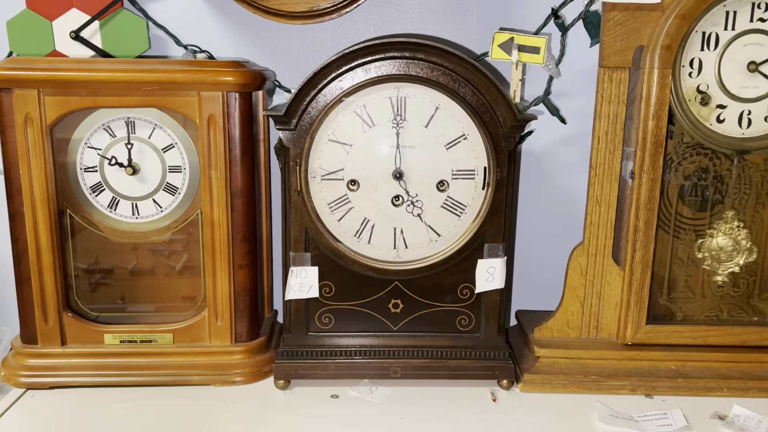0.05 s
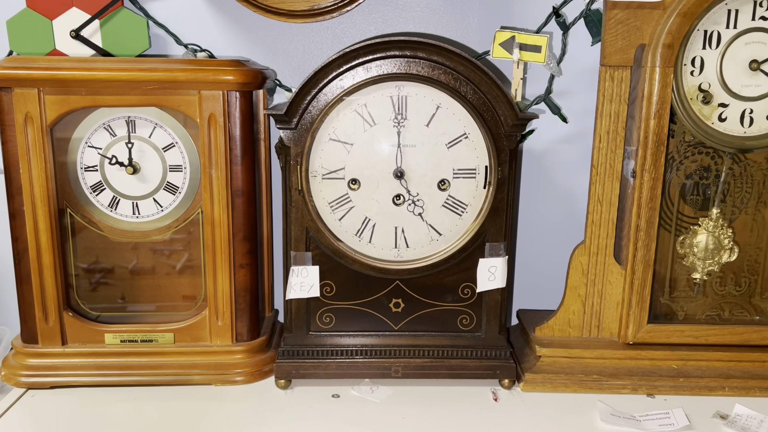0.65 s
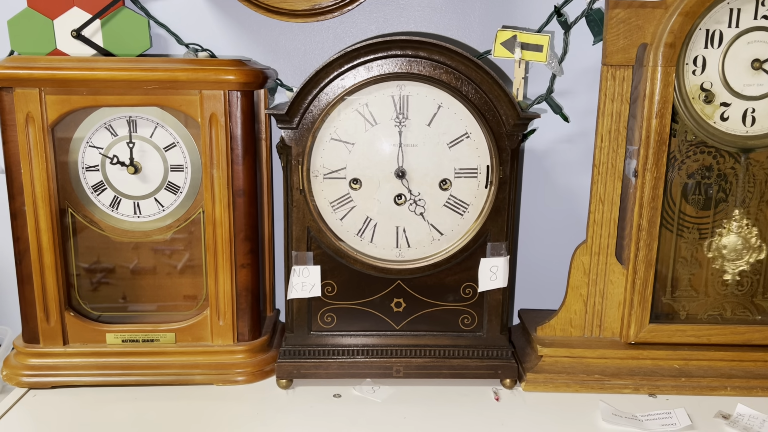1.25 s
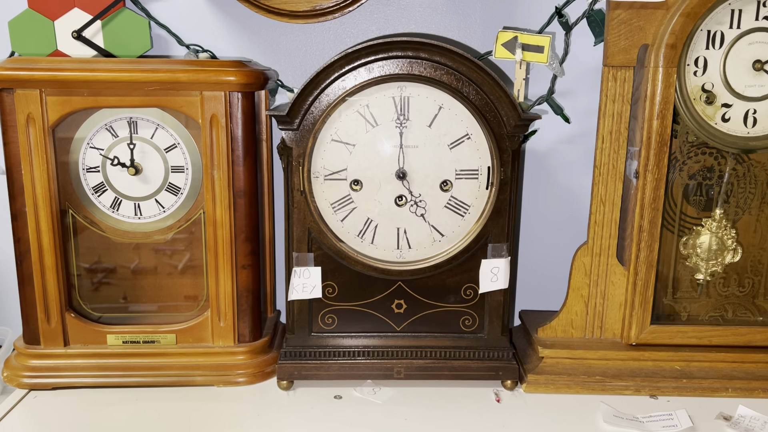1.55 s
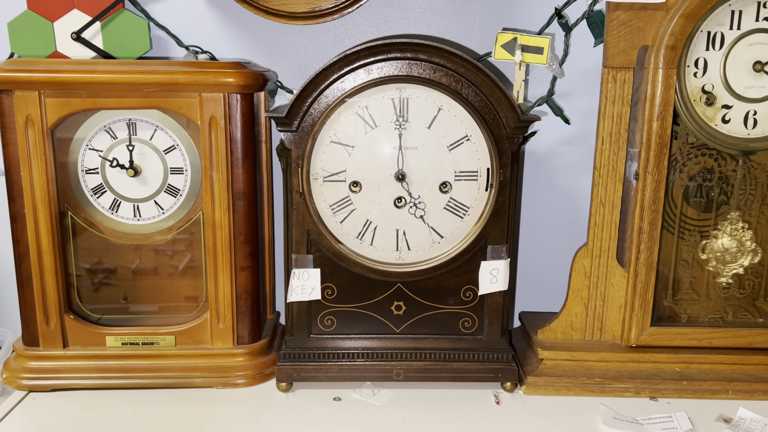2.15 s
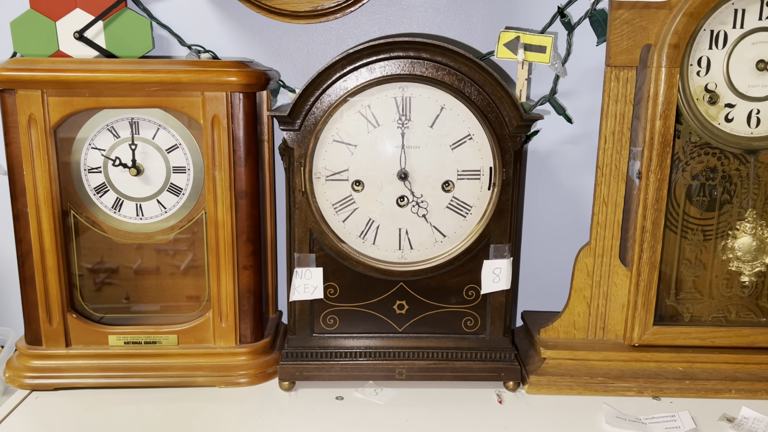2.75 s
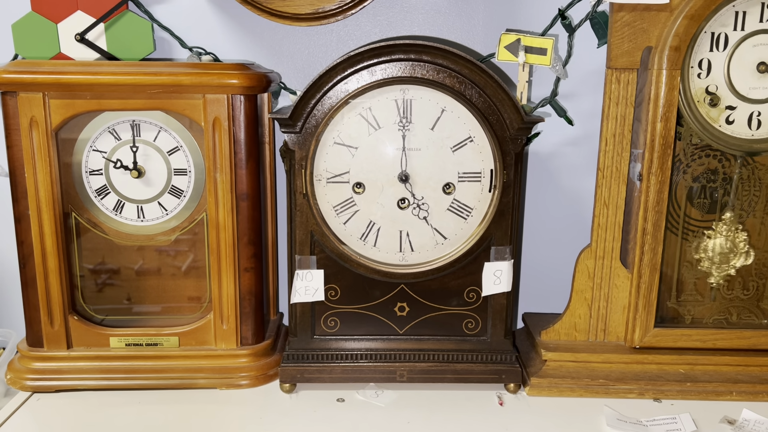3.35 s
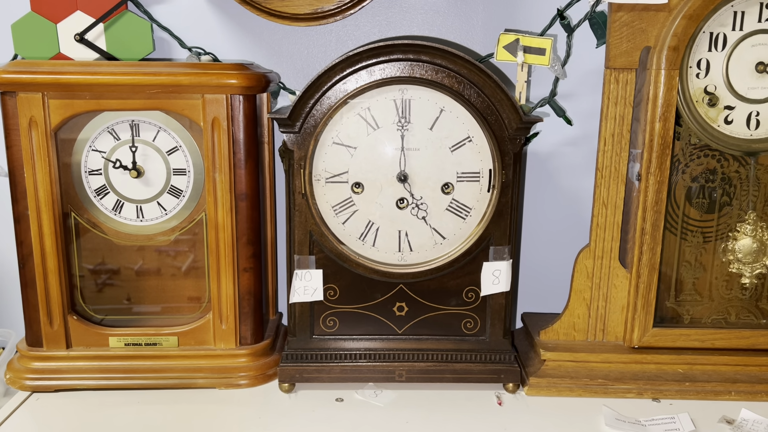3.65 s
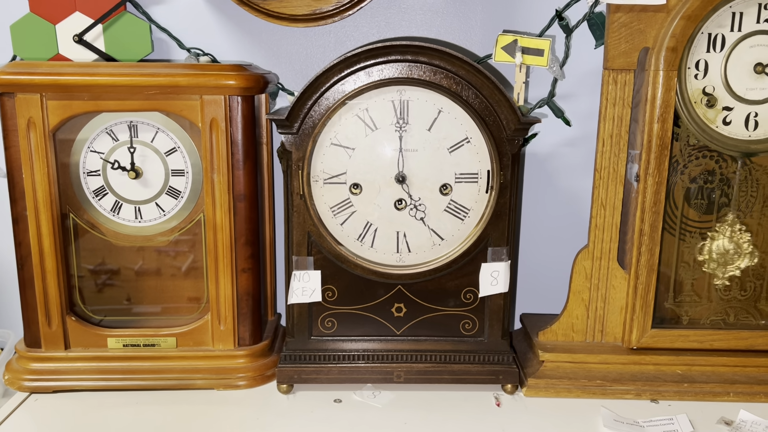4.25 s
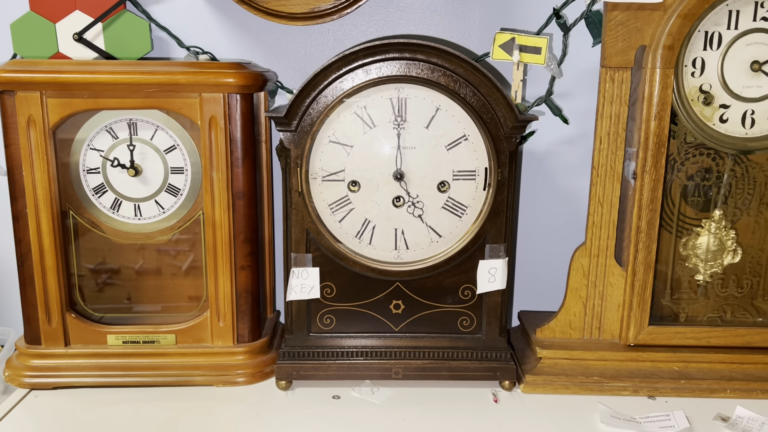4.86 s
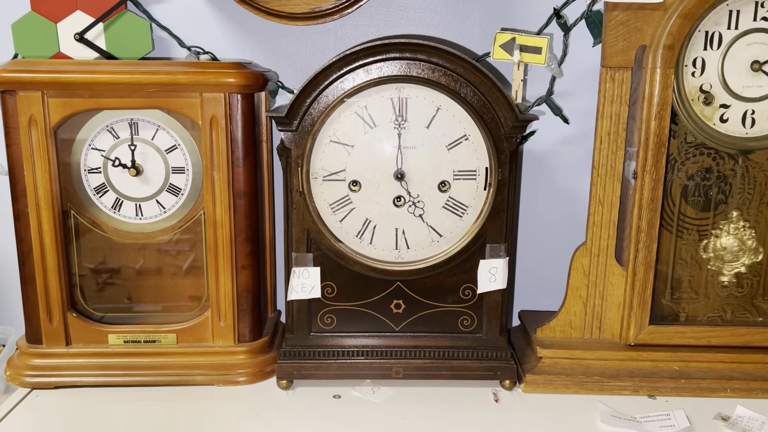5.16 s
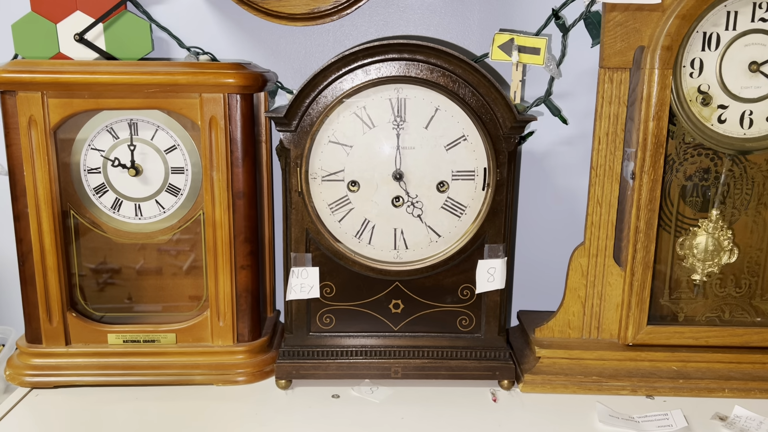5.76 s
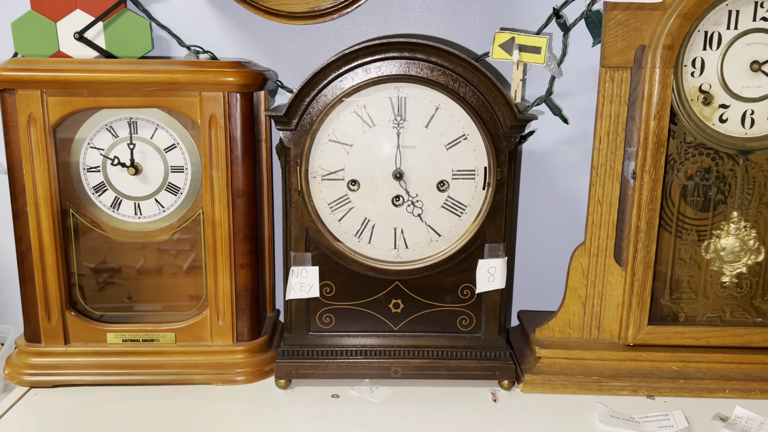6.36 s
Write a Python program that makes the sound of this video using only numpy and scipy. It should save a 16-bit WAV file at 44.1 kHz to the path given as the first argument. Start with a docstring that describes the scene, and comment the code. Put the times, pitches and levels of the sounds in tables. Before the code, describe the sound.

A shop full of clocks ticks steadily from start to finish. Close to the microphone, crisp brass ticks and wooden knocks overlap in an uneven, busy pattern, with one low clock thudding softly beneath them. Thin plastic clicks and fainter, more distant ticking fill the gaps. The room gives each beat a short echo, and a low hum and faint air noise lie underneath throughout.

```python
"""Pendulum clocks knock and ring in their wooden cases on a shop shelf, each at its own pace.
Quartz movements snap once a second beside them, small balance wheels patter, far clocks tick at random.
Every beat is a snap of hard parts, a short rattle and the ring of the case, echoed by shelf and room.
Underneath, a motor hums through the building and the ventilation breathes."""
import sys
import numpy as np
from scipy import signal
from scipy.fft import rfft, irfft
from scipy.io import wavfile

SR = 44100
rng = np.random.default_rng(int(sys.argv[2]) if len(sys.argv) > 2 else 0)


def output_pcm(signal):
    """Save a mono or channel-first signal as 16-bit PCM at the path in sys.argv[1].

    Samples are clipped to [-1, 1] before scaling.
    """
    pcm = np.clip(np.atleast_2d(signal).T, -1, 1) * 32767
    wavfile.write(sys.argv[1], SR, np.round(pcm).astype(np.int16))


N = 282681
BEAT_SIZE, CONTACT_SIZE = 12288, 64  # samples in one beat with its tail, and in one bounce


def amp(db):
    """Decibels to gain."""
    return 10 ** (np.asarray(db) / 20)


def unit(x):
    """Scales each channel to energy 1."""
    return x / np.sqrt(np.sum(x ** 2, -1, keepdims=True) + 1e-30)


def read(points, hz):
    """Reads a curve on a log-frequency axis."""
    freq, value = np.transpose(points)
    return np.interp(np.log(hz + 1), np.log(freq + 1), value)


def impulse(spectrum):
    """A minimum-phase click with the given tone colour."""
    log_gain = np.log(amp(read(spectrum, abs(np.fft.fftfreq(BEAT_SIZE, 1 / SR)))))
    return irfft(np.exp(signal.hilbert(log_gain).conj())[:BEAT_SIZE // 2 + 1])


def through(x, path):
    """Sends one beat along a stereo echo path."""
    return signal.fftconvolve(x[None], path, axes=1)[:, :BEAT_SIZE]


def every(cycle_s, contacts, uneven_db=1.5):
    """Loops the contacts of one cycle; each tooth of the wheel lands a little harder or softer."""
    return [(s, db + uneven_db * rng.standard_normal())
            for first, db in contacts for s in np.arange(first, N / SR, cycle_s)]


# Colour of the room tone. Each row: frequency in Hz, relative level in dB.
AIR_COLOUR = [(20, -27), (32, -8), (42, 3.5), (100, -3.5), (160, -4), (220, 1), (295, -2), (319, 5.5),
              (345, -5), (400, -6), (490, -5.5), (620, -11.5), (1200, -13), (2100, -13.5), (3200, -20),
              (5000, -29), (8500, -36), (15000, -44.5)]
# Its stereo width. Each row: frequency in Hz, left-right correlation.
AIR_CORRELATION = [(60, .98), (150, .88), (300, .7), (600, .5), (1200, 0), (8000, .1)]
def air(wash_db=-61, rumble_db=-65.5):
    """A bed of ventilation and blurred distant clocks: wide on top, centred in the bass."""
    hz = np.fft.rfftfreq(N, 1 / SR)
    left, other, low = rfft(rng.standard_normal((3, N)))
    same = read(AIR_CORRELATION, hz)
    right = same * left + np.sqrt(1 - same ** 2) * other
    wash = irfft(np.array([left, right]) * amp(read(AIR_COLOUR, hz)), N)
    rumble_eq = [(15, -36), (32, -23), (45, 3), (60, -6.5), (80, 1.5), (110, -17), (400, -57),
                 (2000, -100)]  # Hz, dB
    rumble = irfft(low * amp(read(rumble_eq, hz)), N)
    return np.sqrt(N) * (amp(wash_db) * unit(wash) + amp(rumble_db) * unit(rumble))


# The hum, main tone first. Each row: frequency in Hz, relative level in dB.
HUM_TONES = [(59.02, -42), (46.9, -62), (71.1, -62.5), (56.5, -74), (106, -76), (118.04, -67), (318.7, -77)]
def motor(waver_hz=0.057, gain_db=0.5, pan_db=-1.67):
    """A motor hums through the building; side tones make it throb twelve times a second."""
    knots = np.linspace(0, N, 26)
    drift = np.interp(np.arange(N), knots, rng.standard_normal(len(knots)))
    speed = 1 + waver_hz * drift / HUM_TONES[0][0]
    hum = sum(amp(db) * np.sin(2 * np.pi * np.cumsum(hz * speed) / SR) for hz, db in HUM_TONES)
    return np.sqrt(2) * amp(gain_db) * hum * amp([[pan_db / 2], [-pan_db / 2]])


# The shop's reverb. Each row: frequency in Hz, decay time (T60) in seconds.
ROOM_DECAY = [(200, 0.24), (1000, 0.26), (2500, 0.25), (5000, 0.2), (9000, 0.11), (15000, 0.066)]
def room_path(near_db, room_db, shelf_t60, lag_ms, build_s=0.0072, shared_hz=600):
    """Direct sound (lag_ms later on the left), near echoes off shelf and wall, then the room's tail."""
    t = np.arange(BEAT_SIZE) / SR
    direct = np.sinc((t - np.maximum([[lag_ms], [-lag_ms]], 0) / 1000) * SR)
    shelf, diffuse = rng.standard_normal((2, 2, BEAT_SIZE))
    shelf *= (rng.random(shelf.shape) < 1500 / SR) * amp(-60 * t / shelf_t60)  # 1500 echoes a second
    hz, frame_s, bands = signal.stft(diffuse, SR, nperseg=256)
    bands *= amp(-60 * frame_s / read(ROOM_DECAY, hz)[:, None])
    tail = signal.istft(bands, SR, nperseg=256)[1][:, :BEAT_SIZE] * (1 - np.exp(-t / build_s))
    left, other = rfft(amp(near_db) * unit(shelf) + amp(room_db) * unit(tail))
    # long waves reach both sides alike
    same = 1 / (1 + (np.fft.rfftfreq(BEAT_SIZE, 1 / SR) / shared_hz) ** 2)
    right = same * left + np.sqrt(1 - same ** 2) * other
    return direct + irfft(np.array([left, right]))


def glint(count=3, low_hz=5940, high_hz=11780, t60=0.1):
    """A few tiny springs and teeth ring briefly, other ones at every beat."""
    t = np.arange(BEAT_SIZE) / SR
    hz = rng.uniform(low_hz, high_hz, (count, 1, 1))
    strength = rng.exponential(1, (count, 1, 1))
    tones = strength * np.sin(2 * np.pi * (hz * t + rng.random((count, 2, 1))))
    return unit(tones.sum(0) * amp(-60 * t / t60))


# The attack as hard parts first touch. Each row: frequency in Hz, relative level in dB.
SNAP_COLOUR = [(1000, 0), (3000, 7), (5200, -5), (8500, -4.5), (12000, -15), (16000, -10.5)]
def clock(beats, modes, colour, ring_db, clatter_db, clatter_t60, rise_s, near_db, room_db, pan_db,
          shelf_t60=0.11, bounce_db=4, detune=0.0033, snap_db=-30, lag_ms=0, ring_echo_db=0,
          glint_db=None):
    """Each beat layers a snap, a clatter of small parts and ringing modes; all levels are relative."""
    t = np.arange(BEAT_SIZE) / SR
    out = np.zeros((2, N + BEAT_SIZE))
    path = room_path(near_db, room_db, shelf_t60, lag_ms)
    ring_path = room_path(near_db + ring_echo_db, room_db + ring_echo_db, shelf_t60, lag_ms)
    swell = 1 - np.exp(-t / rise_s)  # the parts slide into contact
    rings = [amp(db) * unit(through(swell * np.sin(2 * np.pi * hz * t) * amp(-60 * t / t60), ring_path))
             for hz, db, t60 in modes]
    usual_rattle = rng.standard_normal(BEAT_SIZE)
    case = through(impulse(colour), path)
    snap_path = room_path(near_db=3.5, room_db=-12, shelf_t60=0.025, lag_ms=lag_ms)
    snap = unit(through(impulse(SNAP_COLOUR), snap_path))
    for s, db in beats:
        # every tooth lands a little differently, and bounces break the rattle into separate contacts
        rattle = (usual_rattle + 0.47 * rng.standard_normal(BEAT_SIZE)) * swell
        bounces = np.repeat(rng.standard_normal(BEAT_SIZE // CONTACT_SIZE), CONTACT_SIZE)
        rattle *= amp(bounce_db * bounces - 60 * t / clatter_t60)
        # the ring varies in balance (2 dB a mode) and in pitch from beat to beat
        ring = sum((mode * amp(2 * rng.standard_normal()) for mode in rings), np.zeros_like(snap))
        stretch = 1 + detune * rng.standard_normal()
        ring = np.array([np.interp(t * stretch, t, side) for side in ring])
        beat = amp(snap_db) * snap + amp(clatter_db) * unit(through(rattle, case)) + amp(ring_db) * ring
        if glint_db is not None:
            beat += amp(glint_db) * glint()
        out[:, round(s * SR):][:, :BEAT_SIZE] += amp(db) * beat
    # a beat's level is its energy spread over a fiftieth of a second
    return out[:, :N] * np.sqrt(SR / 50) * amp([[pan_db / 2], [-pan_db / 2]])


# Ticking from down the shop. Each row: start in seconds, level in dB.
FAR_BEATS = [(0.758, -76), (1.497, -60.5), (2.264, -59.5), (3.005, -64), (3.764, -58), (4.521, -58),
             (5.253, -59.5), (6.018, -59)]
HOLLOW_BEATS = [(0.163, -58.5), (0.945, -55), (1.177, -61), (1.943, -57), (2.154, -54), (2.95, -56.5),
                (3.14, -56), (3.965, -55), (4.177, -56.5), (4.95, -53), (5.221, -56.5), (5.943, -58.5)]
CHATTER_BEATS = [(0.82, -55), (1.025, -58), (1.362, -58), (1.546, -52), (1.909, -59), (2.597, -51.5),
                 (2.655, -58.5), (3.092, -56.5), (3.448, -69), (3.626, -62), (4.118, -63), (4.228, -58.5),
                 (4.572, -62), (4.652, -66), (4.748, -56), (4.985, -75), (5.045, -77), (5.302, -67),
                 (5.68, -64), (6.15, -65)]
CABINET_BEATS = [(0.125, -59.5), (0.305, -62.5), (0.785, -57), (1.26, -64), (1.38, -65.5), (1.808, -58),
                 (2.38, -57), (2.83, -58.5), (3.51, -64), (3.865, -59), (4.455, -62), (4.62, -62),
                 (4.872, -58), (5.465, -69), (5.93, -57.5)]
# The ring of each case. Each row: pitch in Hz, level in dB, T60 in seconds.
FAR_RING = [(1700, -11, 0.0096), (2005, 0.5, 0.048), (2015, -3.5, 0.015), (2220, 2, 0.034),
            (2426, -6, 0.027)]
HOLLOW_RING = [(1208, -1, 0.028), (1152, -2, 0.059), (1066, -12, 0.15), (1534, -20, 0.054),
               (865, -17, 0.023)]
CHATTER_RING = [(1717, -6, 0.06), (2030, -13, 0.03), (2050, 1.5, 0.08), (2103, -2, 0.054),
                (2497, -5, 0.021), (3560, -5.5, 0.029)]
CABINET_RING = [(256, -2, 0.15), (313.3, -1, 0.4), (393, -7, 0.057), (512, 4, 0.042), (640, -4, 0.035),
                (906, -4, 0.088), (1094, -8, 0.032), (1967, -5.5, 0.057)]
# Dull, woody clatter. Each row: frequency in Hz, level in dB.
FAR_WOOD = [(250, -4.5), (700, -1), (1300, 0), (2100, -2), (2900, -6.5), (5000, -14.5), (9000, -27.5),
            (12000, -35)]
def far_clocks():
    """Wooden cases farther off: a steady tick, a hollow knock, loose chatter and a low cabinet."""
    steady = clock(FAR_BEATS, FAR_RING, FAR_WOOD, ring_db=-5.5, clatter_db=-6, clatter_t60=0.087,
                   rise_s=0.0031, near_db=5.5, room_db=-9, pan_db=-3, detune=0.015)
    hollow = clock(HOLLOW_BEATS, HOLLOW_RING, FAR_WOOD, ring_db=-7.5, clatter_db=-2, clatter_t60=0.14,
                   rise_s=0.0015, near_db=-2.5, room_db=8, pan_db=0.5, detune=0.016, ring_echo_db=-8)
    chatter = clock(CHATTER_BEATS, CHATTER_RING, FAR_WOOD, ring_db=-9, clatter_db=-5, clatter_t60=0.042,
                    rise_s=0.002, near_db=7.5, room_db=-1, pan_db=1, detune=0.0358)
    cabinet = clock(CABINET_BEATS, CABINET_RING, FAR_WOOD, ring_db=-4.5, clatter_db=-1.5,
                    clatter_t60=0.07, rise_s=0.008, near_db=0, room_db=-4, pan_db=0, detune=0.0296)
    return steady + hollow + chatter + cabinet


def clock_crowd(per_s=7, count=128):
    """So many distant clocks that their ticks fall at random."""
    times = np.cumsum(rng.uniform(0.2, 1.8, count)) / per_s
    levels = rng.normal(-66, 3, count)
    beats = [(s, db) for s, db in zip(times, levels) if s < N / SR]
    return clock(beats, FAR_RING + HOLLOW_RING, FAR_WOOD, ring_db=-2.5, clatter_db=-5.5, snap_db=-29,
                 clatter_t60=0.022, rise_s=0.00094, near_db=1.5, room_db=3, pan_db=2, detune=0.12)


# Stray clicks. Each row: start in seconds, level in dB.
LEVER_CLICKS = [(0.127, -62), (0.161, -68), (0.327, -78), (1.738, -67), (2.876, -60), (2.924, -65),
                (3.915, -77), (5.038, -62), (5.301, -61), (6.038, -56.5)]
# Soft-topped plastic clatter. Each row: frequency in Hz, level in dB.
FAR_PLASTIC = [(400, 5.5), (900, -2.5), (2000, -1), (3800, 2), (5000, -7.5), (7000, -12), (10000, -36)]
def levers():
    """Small levers give short, dry clicks."""
    return clock(LEVER_CLICKS, [], FAR_PLASTIC, ring_db=0, clatter_db=-2, clatter_t60=0.025, pan_db=-1,
                 rise_s=0.0008, near_db=5, room_db=3.5, shelf_t60=0.084, snap_db=-20, glint_db=-13)


# One cycle of patter, then loose pings. Each row: start in seconds, level in dB.
BALANCE_LOOP = [(0.173, -58.5), (0.21, -68), (0.37, -61), (0.412, -62)]
BALANCE_PINGS = [(0.926, -65), (1.011, -62.5), (1.624, -61), (1.944, -67.5), (2.021, -60), (2.158, -78),
                 (2.422, -65.5), (2.506, -65.5), (2.608, -61), (3.526, -73), (3.62, -59), (4.201, -61),
                 (4.791, -61), (5.122, -78), (5.787, -66), (6.018, -64)]
# Their high sparkle. Each row: pitch in Hz, level in dB, T60 in seconds.
BALANCE_RING = [(8250, -7, 0.028), (8600, 7.5, 0.03), (9200, -2.5, 0.1), (9330, -2.5, 0.03)]
# Fine steel clatter. Each row: frequency in Hz, level in dB.
STEEL = [(3000, -7), (6000, 5), (7300, 5.5), (8600, 11.5), (9400, -1), (10300, -14), (11500, -24),
         (13500, -49), (15300, -5)]
def balance_wheels(cycle_s=0.4002):
    """Two small wheels patter nearly in step, among scattered pings of steel."""
    patter = clock(every(cycle_s, BALANCE_LOOP), BALANCE_RING, STEEL, ring_db=-23, clatter_db=-8.5,
                   clatter_t60=0.092, rise_s=0.0059, near_db=2, room_db=7, pan_db=0.5, detune=0.015,
                   snap_db=-25, glint_db=-12)
    pings = clock(BALANCE_PINGS, BALANCE_RING, STEEL, ring_db=-17, clatter_db=-6, clatter_t60=0.041,
                  rise_s=0.0012, near_db=-4, room_db=-0.5, pan_db=0.5, detune=0.015, snap_db=-18,
                  glint_db=-12.5)
    return patter + pings


# Three taps. Each row: start in seconds, level in dB.
TAPS = [(2.493, -69), (4.826, -53), (5.098, -50.5)]
# The wood's short note. Each row: pitch in Hz, level in dB, T60 in seconds.
TAP_RING = [(1330, 1.5, 0.02), (1510, -26, .015), (326, -11, 0.058)]
# Clatter with the body of a big case. Each row: frequency in Hz, level in dB.
BIG_CASE = [(200, 1), (450, 3), (850, -13), (1100, -4), (1500, -3), (3200, -8.5), (6500, -17.5),
            (9200, -32), (11000, -32), (16000, -46)]
def wood_taps():
    """Light taps set wood ringing briefly, off to the right."""
    return clock(TAPS, TAP_RING, BIG_CASE, ring_db=-9, clatter_db=-25, clatter_t60=0.0092,
                 rise_s=0.00034, near_db=-20, room_db=-1, pan_db=-5, snap_db=-28)


# Gear steps; a loop holds one cycle. Each row: start in seconds, level in dB.
NEAR_LOOP = [(0.547, -60.5), (0.563, -49.5), (0.582, -60)]
THIN_STEPS = [(0.735, -57), (0.76, -56), (1.737, -65), (1.76, -56.5), (2.737, -62.5), (2.76, -54),
              (3.735, -64), (3.76, -54.5), (4.735, -59.5), (4.762, -53), (5.738, -63), (5.76, -55)]
SIDE_LOOP = [(0.044, -54), (0.957, -66)]
BACK_LOOP = [(0.494, -59)]
REAR_STEPS = [(0.24, -61.5), (1.24, -57), (2.235, -57), (3.24, -69), (4.238, -57.5), (5.235, -65),
              (6.24, -68)]
FAR_LOOP = [(0.877, -61.5)]
# The housings' tight ring. Each row: pitch in Hz, level in dB, T60 in seconds.
NEAR_RING = [(3680, -0.57, 0.014), (5160, -2.8, 0.019), (5530, 0.78, 0.0098)]
THIN_RING = [(2017, 4.5, 0.025), (4100, -11, 0.011), (6410, 0, 0.016), (7170, -21, 0.039)]
BACK_RING = [(2258, 1.5, 0.027), (2490, -3.5, 0.062)]
# Gear clatter. Each row: frequency in Hz, level in dB.
PLASTIC = [(400, -13), (900, -6.5), (1600, 3.5), (2800, -3), (4200, -4.5), (5300, -1.5), (6500, -7.5),
           (8000, -3.5), (9300, -6), (10300, -12), (11300, -16.5), (13500, -43), (15500, -17)]
THIN_PLASTIC = [(400, 7.5), (900, 0), (1700, 9), (2800, -2), (4500, 0), (6200, -9.5), (9300, -6),
                (10500, -6), (13500, -64), (15500, -17)]
SIDE_PLASTIC = [(400, -11.5), (1000, -1.5), (1800, -3), (3000, -7.5), (4200, -4), (5500, -10.5),
                (7000, -11), (9200, -14), (10500, -27), (15500, -36)]
def quartz_clocks(cycle_s=1):
    """Stepper motors jerk plastic gears once a second."""
    near = clock(every(cycle_s, NEAR_LOOP), NEAR_RING, PLASTIC, ring_db=-12.5, clatter_db=-1,
                 clatter_t60=0.051, rise_s=0.0045, near_db=2.5, room_db=3.5, pan_db=0.5, lag_ms=-0.287,
                 glint_db=-15)
    thin = clock(THIN_STEPS, THIN_RING, THIN_PLASTIC, ring_db=-13.5, clatter_db=3, clatter_t60=0.037,
                 rise_s=0.00034, near_db=5.5, room_db=9.5, pan_db=1.5, shelf_t60=0.044, lag_ms=0.15,
                 glint_db=-12, ring_echo_db=-4)
    side = clock(every(cycle_s, SIDE_LOOP), [], SIDE_PLASTIC, ring_db=0, clatter_db=-0.5,
                 clatter_t60=0.14, rise_s=0.00075, near_db=5.5, room_db=2, pan_db=1)
    back = clock(every(cycle_s, BACK_LOOP), BACK_RING, FAR_WOOD, ring_db=-4, clatter_db=-10,
                 clatter_t60=0.14, rise_s=0.0037, near_db=-13, room_db=3, pan_db=1)
    rear = clock(REAR_STEPS, [], SIDE_PLASTIC, ring_db=0, clatter_db=-4.5, clatter_t60=0.035,
                 rise_s=0.0023, near_db=-3, room_db=8, pan_db=0.5)
    far = clock(every(cycle_s, FAR_LOOP), [], FAR_PLASTIC, ring_db=0, clatter_db=5, clatter_t60=0.79,
                rise_s=0.0019, near_db=6, room_db=3, pan_db=3)
    return near + thin + side + back + rear + far


# The big case's low notes. Each row: pitch in Hz, level in dB.
BOOM_MODES = [(210, -0.5), (245.2, -9.5), (194.4, -7)]
def boom(beats, delay_s, swell_s, boom_db, detune=0.021):
    """The air and back board of a big case swell up after the beat and die away."""
    t = np.arange(BEAT_SIZE) / SR
    out = np.zeros(N + BEAT_SIZE)
    swell = (t / swell_s * np.exp(1 - t / swell_s)) ** 2
    for s, db in beats:
        for hz, mode_db in BOOM_MODES:
            pitch = hz * (1 + detune * rng.standard_normal())
            tone = np.sin(2 * np.pi * (pitch * t + rng.random()))
            out[round((s + delay_s) * SR):][:BEAT_SIZE] += amp(db + boom_db + mode_db) * swell * tone
    return out[:N]


# The deep clock's beats. Each row: start in seconds, level in dB.
DEEP_TICKS = [(0.66, -54), (1.508, -54.5), (2.355, -54.5), (3.204, -53), (4.052, -52.5), (4.9, -54),
              (5.748, -53)]
DEEP_TOCKS = [(0.222, -63), (1.07, -63.5), (1.918, -64), (2.766, -64.5), (3.614, -62), (4.462, -65),
              (5.31, -67), (6.158, -63)]
PALLET_LOOP = [(0.216, -55)]
# Their warm ring. Each row: pitch in Hz, level in dB, T60 in seconds.
DEEP_TICK_RING = [(490, 0, 0.19), (692, -2.5, 0.14), (832, 0, 0.11), (889, -1, 0.17), (1417, -4.5, 0.05),
                  (1950, -10, 0.071), (2833, -12, 0.078)]
DEEP_TOCK_RING = [(244, -2.5, 0.16), (264, -14, 0.079), (806, -3.5, 0.037), (1037, -14, 0.08)]
def deep_pendulum(cycle_s=0.848):
    """An escapement in a deep case; its metal pallet clicks just before each tock booms."""
    ticks = clock(DEEP_TICKS, DEEP_TICK_RING, BIG_CASE, ring_db=-4.5, clatter_db=-0.5, clatter_t60=0.032,
                  rise_s=0.0013, near_db=8.5, room_db=-4.5, pan_db=-0.5, shelf_t60=0.17,
                  ring_echo_db=-7.5)
    body = boom(DEEP_TICKS, delay_s=0.01765, swell_s=0.02, boom_db=-7)
    body += boom(DEEP_TOCKS, delay_s=0.0012, swell_s=0.034, boom_db=10.5)
    pallet = clock(every(cycle_s, PALLET_LOOP), FAR_RING, FAR_WOOD, ring_db=-13, clatter_db=-1,
                   clatter_t60=0.087, rise_s=0.00051, near_db=14, room_db=-11, pan_db=-1.5,
                   shelf_t60=0.12, lag_ms=0.11, snap_db=-21)
    tocks = clock(DEEP_TOCKS, DEEP_TOCK_RING, FAR_WOOD, ring_db=-1, clatter_db=-10, clatter_t60=0.048,
                  rise_s=0.018, near_db=-9, room_db=8, pan_db=3, detune=0.018)
    return ticks + body + pallet + tocks


# The two clocks' beats. Each row: start in seconds, level in dB.
SLOW_BEATS = [(0.383, -53), (1.154, -54.5), (1.896, -51.5), (2.643, -55.5), (3.389, -51), (4.127, -51),
              (4.867, -52), (5.611, -52), (6.353, -51.5)]
SIDE_BEATS = [(0.484, -58), (0.831, -57.5), (1.47, -57.5), (1.819, -58), (2.456, -56), (2.807, -59.5),
              (3.443, -55.5), (3.795, -57.5), (4.436, -56), (4.783, -61), (5.414, -55.5), (5.771, -60)]
# Their ring. Each row: pitch in Hz, level in dB, T60 in seconds.
SLOW_RING = [(2455, -6, 0.04), (2450, -4.5, 0.018), (2190, -9.5, 0.018), (1985, -12, .02), (1110, -12, .06),
             (3950, -21, .025)]
SIDE_RING = [(1690, -1.5, 0.14), (1694, -4, 0.026), (5520, -2, 0.06), (5900, -7, 0.054)]
# Tinny clatter. Each row: frequency in Hz, level in dB.
SIDE_METAL = [(400, -11), (1000, -10), (1800, -5), (3000, -16), (4200, -3), (5500, -11.5), (7000, -11),
              (9200, -12), (10500, -22), (15500, -14)]
def roomy_pendulums():
    """Two escapements with plenty of room on them: one slow and woody, one metallic off to the side."""
    slow = clock(SLOW_BEATS, SLOW_RING, FAR_WOOD, ring_db=-5.5, clatter_db=-5.5, clatter_t60=0.049,
                 rise_s=0.0041, near_db=11.5, room_db=5.5, pan_db=-0.5, detune=0.0032, shelf_t60=0.14,
                 lag_ms=-0.4, ring_echo_db=-5)
    side = clock(SIDE_BEATS, SIDE_RING, SIDE_METAL, ring_db=-7.5, clatter_db=-2.5, clatter_t60=0.13,
                 rise_s=0.00087, near_db=7, room_db=7.5, pan_db=-1, snap_db=-13, lag_ms=0.15,
                 ring_echo_db=-5, glint_db=-13)
    return slow + side


# The foreground beats. Each row: start in seconds, level in dB.
BRIGHT_BEATS = [(0.522, -52), (1.014, -53), (1.55, -55.5), (2.043, -49), (2.579, -53.5), (3.071, -51),
                (3.609, -55.5), (4.099, -51.5), (4.635, -52.5), (5.13, -53.5), (5.662, -55), (6.159, -51.5)]
LIMPING_TICK_LOOP = [(0.5515, -55)]
LIMPING_TOCKS = [(1.003, -44), (2.039, -46.5), (3.074, -45.5), (4.108, -46), (5.141, -44), (6.176, -44.5)]
QUICK_LOOP = [(0.283, -56.5), (0.715, -58.5)]
# The voice of each beat. Each row: pitch in Hz, level in dB, T60 in seconds.
BRIGHT_RING = [(3838, -7, 0.22), (3785, -3, 0.079), (3600, -17, .02), (2197, -1.5, 0.14), (1520, -6, 0.099),
               (2025, -9, 0.051), (1652, -6, 0.12)]
LIMPING_TICK_RING = [(4785, 2.5, 0.022), (4600, -8.5, 0.016), (4800, -23, 0.0076), (2580, -3.5, 0.032),
                     (1730, -9, 0.02)]
LIMPING_TOCK_RING = [(1148, -6.5, 0.044), (1573, -6, 0.096), (1698, -4, 0.037), (1900, -3, 0.09),
                     (2076, -6.5, 0.1), (2260, -11, 0.09), (3380, -9, 0.04), (2864, -14.5, 0.045),
                     (3810, -8, 0.055)]
QUICK_RING = [(4920, 1, 0.034), (5080, -6.5, 0.034), (2820, -9.5, 0.029), (2600, 1, 0.095),
              (1730, -20, 0.06), (898, 5, 0.017)]
# Clatter of works and case. Each row: frequency in Hz, level in dB.
BRASS = [(400, -48), (1000, 2.5), (2000, 8), (3500, -5), (5200, 0.5), (7000, -12), (9200, -17),
         (10500, -32), (16000, -43)]
THICK_WOOD = [(300, -1.5), (800, -1.5), (1300, -9), (2000, 5), (3500, -0.5), (5000, -4.5), (7000, -24),
              (9300, -28), (11000, -22), (16000, -44)]
def lead_pendulums(limping_cycle_s=1.0344, quick_cycle_s=0.9093):
    """Three brass escapements: one bright, one out of beat with a heavy wooden tock, one quick."""
    bright = clock(BRIGHT_BEATS, BRIGHT_RING, BRASS, ring_db=-3, clatter_db=-7.5, clatter_t60=0.2,
                   rise_s=0.0035, near_db=5, room_db=-7.5, pan_db=1, shelf_t60=0.087, lag_ms=-0.28,
                   ring_echo_db=-8.5, detune=0.0014)
    limping = clock(every(limping_cycle_s, LIMPING_TICK_LOOP), LIMPING_TICK_RING, BRASS, ring_db=-6.5,
                    clatter_db=-6.5, clatter_t60=0.026, rise_s=0.0016, near_db=11, room_db=0, pan_db=0,
                    shelf_t60=0.062, detune=0.0031, ring_echo_db=-1.5, snap_db=-22)
    limping += clock(LIMPING_TOCKS, LIMPING_TOCK_RING, THICK_WOOD, ring_db=-9, clatter_db=-6.5,
                     clatter_t60=0.06, rise_s=0.0013, near_db=4, room_db=-3, pan_db=0.5, shelf_t60=0.043,
                     snap_db=-21, bounce_db=10, lag_ms=-0.35, ring_echo_db=-3.5, detune=0.0022)
    quick = clock(every(quick_cycle_s, QUICK_LOOP), QUICK_RING, BRASS, ring_db=-11, clatter_db=0,
                  clatter_t60=0.044, rise_s=0.00036, near_db=18, room_db=0, pan_db=0.5, shelf_t60=0.15,
                  snap_db=-7.5, lag_ms=0.18)
    return bright + limping + quick


def scene():
    """All the clocks in the humming shop."""
    pendulums = lead_pendulums() + deep_pendulum() + roomy_pendulums()
    return (pendulums + quartz_clocks() + far_clocks() + clock_crowd() + levers() + balance_wheels()
            + wood_taps() + motor() + air())


# Overall EQ. Each row: frequency in Hz, gain in dB.
MASTER_EQ = [(8000, 0.5), (9300, -1), (10300, -16.5), (11400, -2), (13600, -9), (15200, -5)]
# Stereo tilt. Each row: frequency in Hz, left minus right in dB.
STEREO_TILT = [(700, 0), (2000, -0.5), (3300, -1.5), (4000, 2.5), (5000, 3), (5700, 5), (7000, -0.5),
               (7800, -1.5), (9500, -0.5)]
def record(dry, start_s=0.083, cutoff_hz=15750):
    """Dulls the top octave, brightens the left, cuts in after a moment of silence, then low-passes."""
    hz = np.fft.rfftfreq(N, 1 / SR)
    eq_db = read(MASTER_EQ, hz) + np.outer([0.5, -0.5], read(STEREO_TILT, hz))
    dull = irfft(rfft(dry) * amp(eq_db), N)
    gated = dull * (np.arange(N) >= start_s * SR)
    lowpass = signal.firwin(511, cutoff_hz, window=("kaiser", 9), fs=SR)
    return signal.oaconvolve(gated, lowpass[None], "same")


dry = scene()
out = record(dry)
output_pcm(out)
```